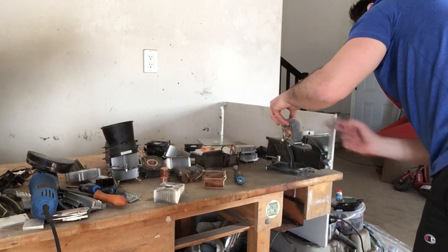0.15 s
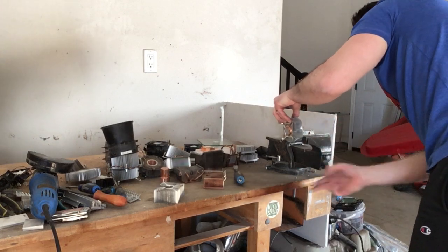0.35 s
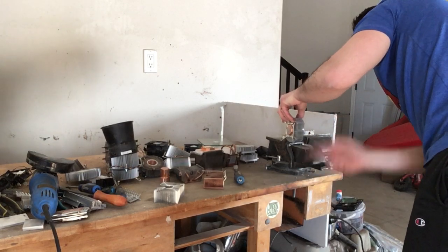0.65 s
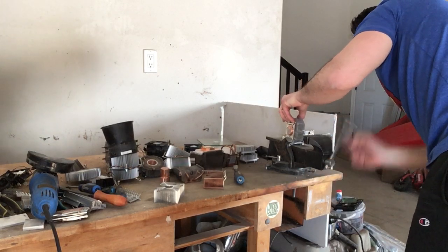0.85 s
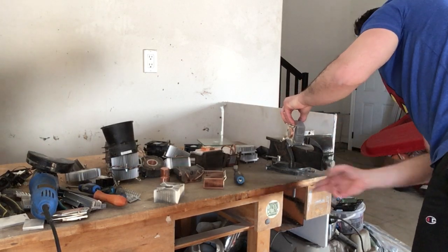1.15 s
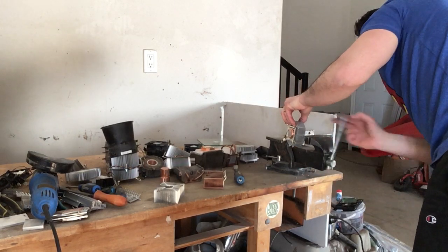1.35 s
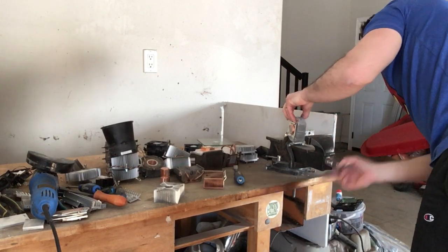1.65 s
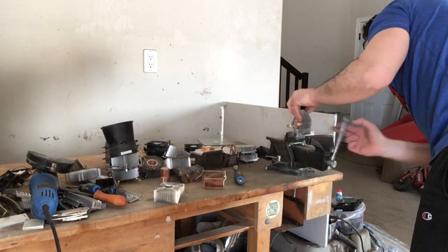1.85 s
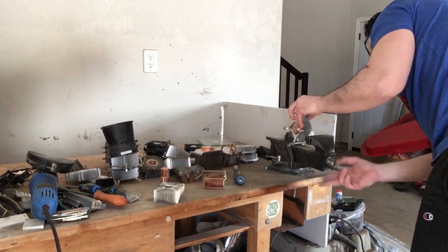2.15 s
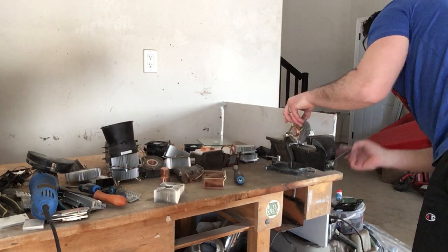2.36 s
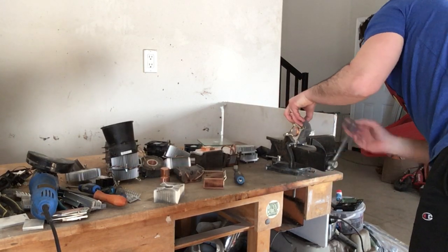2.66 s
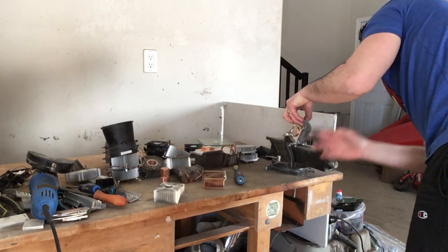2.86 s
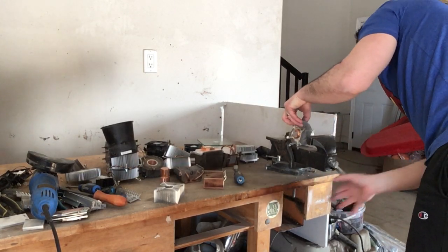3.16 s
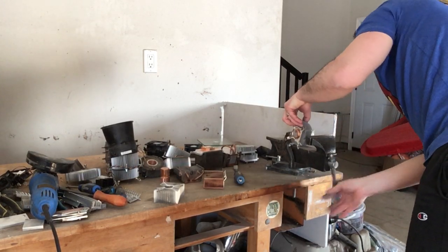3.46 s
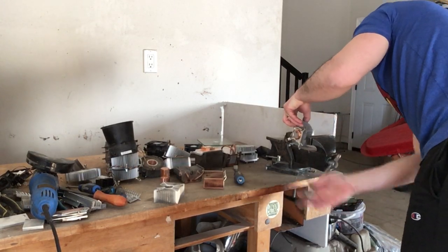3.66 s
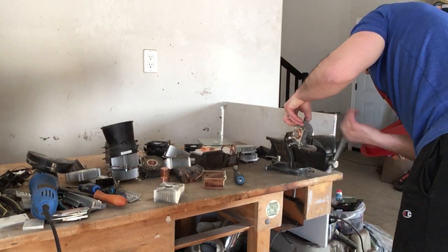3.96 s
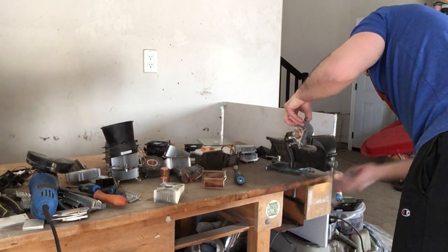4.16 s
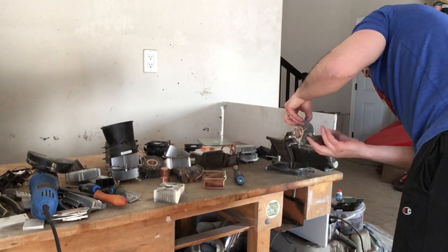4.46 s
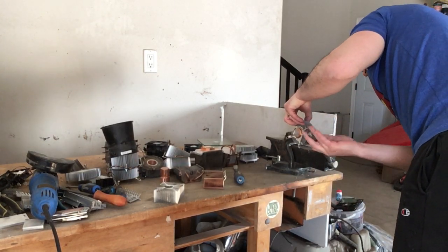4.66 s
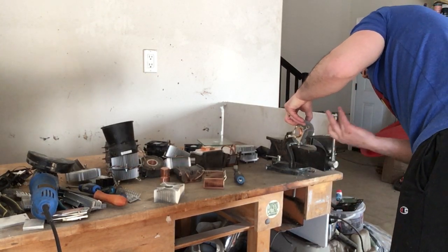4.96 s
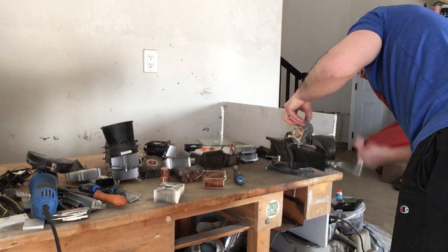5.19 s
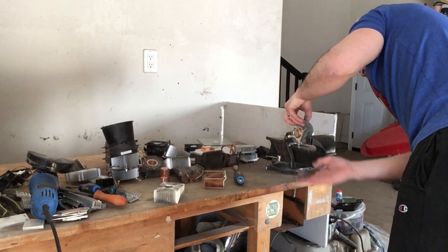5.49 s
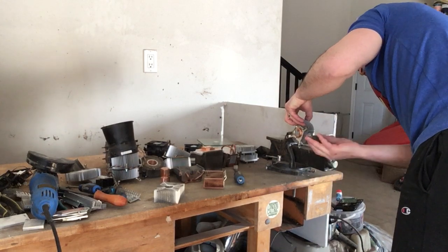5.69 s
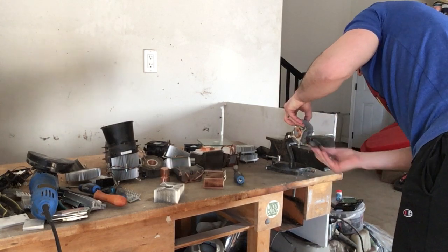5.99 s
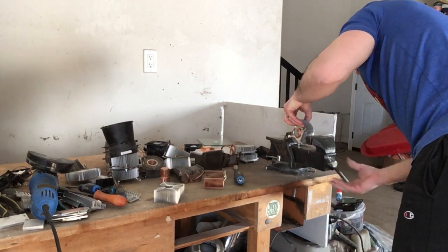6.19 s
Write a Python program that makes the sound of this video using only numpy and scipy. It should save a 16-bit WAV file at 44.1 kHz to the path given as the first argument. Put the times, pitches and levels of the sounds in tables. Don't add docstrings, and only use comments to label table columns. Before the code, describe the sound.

A heavy bench vise is worked by hand in a bare, hard-walled workshop. Soft palm slaps precede hard clanks of the sliding bar at about 0.2, 0.55, 0.93 and 1.37 seconds; the first chatters in quick repeats, and each has a sharp steel crack, a bright, short, stiff chime and a wooden bench knock. From 1.7 to 3.5 the contacts become lighter: pats, thin clicks, tinkling taps and small ringing parts, busiest around 2.7 and 3.1. Stronger clanks return at 3.77, 3.88, 4.1 and 4.23, with a duller one near 4.47. Afterward come small shuffles and rattles, a light clank at 5.2, a firm slap with a clink at 5.7, and faint taps around 6.0 to 6.2. Low, soft footsteps thud on boards from 4.5 onward. Uneven screw grinding and quiet room hum lie beneath, and walls return dense, short echoes.

```python
import sys
import numpy as np
from scipy import signal
from scipy.fft import rfft, irfft, next_fast_len
from scipy.io import wavfile
from scipy.ndimage import map_coordinates

SR = 44100
rng = np.random.default_rng(int(sys.argv[2]) if len(sys.argv) > 2 else 0)


def wav_out(sig):
    wavfile.write(sys.argv[1], SR, np.round(np.clip(np.atleast_2d(sig).T, -1, 1) * 32767).astype(np.int16))


def gain_from_db(level_db):
    decades = np.asarray(level_db, float) / 20
    return 10 ** decades


N = 279153

SPAN, TAIL = SR // 4, SR // 2
LEAD = SR // 4
T = np.arange(SPAN) / SR

# pitch_hz, width_hz, level_db
BENCH = [(112, 18, -4.5), (214.4, 27.3, 2), (328.4, 32, 1), (469, 51.5, -3), (590, 64, -11.5)]
# pitch_hz, width_hz, level_db
VISE_BODY = [(710, 113, 12), (1510, 430, 3.5), (1995, 150, 6.5), (2680, 220, -2.5)]


def unit(x):
    return x / np.sqrt(np.mean(x ** 2) + 1e-20)


def top(x):
    return x / np.abs(x).max()


def along(points, hz):
    f, v = np.transpose(points)
    return np.interp(np.log(hz + 1), np.log(f + 1), v)


def filtered(x, response):
    m = next_fast_len(len(x) + 4096)
    return irfft(rfft(x, m) * response(np.fft.rfftfreq(m, 1 / SR)), m)[:len(x)]


def shaped(x, curve):
    return filtered(x, lambda f: gain_from_db(along(curve, f)))


def resonant(peaks):
    def response(f):
        total = 0
        for k, (hz, width, db) in enumerate(peaks):
            peak = 1j * f * width / (hz * hz - f * f + 1j * f * width)
            total = total + (-1) ** k * gain_from_db(db) * peak
        return total
    return response


def ring(modes, attack=0.0001):
    waver = .005
    total = 0
    for hz, db, t60 in modes:
        strength_db = db + rng.normal(0, 1.5)
        drift = np.repeat(rng.standard_normal(SPAN // 64 + 1), 64)[:SPAN]
        clock = T + waver * np.cumsum(drift) / SR
        fade = gain_from_db(strength_db - 60 * T / t60)
        total = total + fade * np.sin(2 * np.pi * (hz * clock + rng.random()))
    return total * (1 - np.exp(-T / attack))


def puff(t60, attack=0.0001):
    return rng.standard_normal(SPAN) * gain_from_db(-60 * T / t60) * (1 - np.exp(-T / attack))


def add(track, s, hit, wet_db):
    # pitch_hz, t60_s
    wall_ring = [(200, 0.4), (600, 0.61), (1400, 0.64), (3700, 0.71), (9000, 0.57), (15000, 0.37)]
    hz, t, z = signal.stft(rng.standard_normal(TAIL), SR, nperseg=256)
    z = z * gain_from_db(-60 * t / along(wall_ring, hz)[:, None])
    tail = signal.istft(z, SR, nperseg=256)[1][:TAIL]
    tail = tail * (1 - np.exp(-(np.arange(TAIL) / SR / 0.0032) ** 2))
    echo = signal.fftconvolve(hit, tail / np.linalg.norm(tail))

    near = 0
    for k in rng.integers(SR // 600, SR // 60, size=10):
        echo_db = rng.normal(-10, 2) - 351.5 * k / SR
        near = near + gain_from_db(echo_db) * rng.choice([-1, 1]) * np.roll(hit, k)

    start = LEAD + round(s * SR)
    track[start:][:SPAN] += hit + gain_from_db(-2.0) * near
    track[start:][:len(echo)] += gain_from_db(wet_db) * echo


def clanks(track):
    # start_s, main_peak_db, low_db, third_db, fourth_db
    bar_blows = [(0.1926, -9, -17, -17.5, -11), (0.205, -18, -25, -24, -15), (0.2357, -21, -40, -35, -25),
                 (0.557, -8.5, -14, -11.5, -6.5), (0.6, -32, -41, -17, -35), (0.9318, -9, -12.5, -18, -3),
                 (0.9528, -45, -18, -14, -19), (1.373, -13.5, -11, -12.5, -10), (2.7364, -32, -5, -5, -15),
                 (3.7637, -28, -2, 1.5, -2), (3.7709, -17.5, -13, -14, -14), (3.8751, -20.5, -5, -6, -0.5),
                 (4.0943, -30, -0.5, -9.5, -17), (4.113, -22, -31, -13.5, -14),
                 (4.2277, -32, -6.5, -6.5, -0.5), (4.4696, -36.5, 11, -12, -9),
                 (5.2012, -27.5, -14, -10.5, -11.5), (5.385, -53, 13.5, 6.5, -15),
                 (5.4136, -39, -12, -14, -24), (6.0344, -64.5, 2.5, 11, 4), (6.199, -47.5, -3, -12, -29)]
    # start_s, top_db, sixth_db, crash_db
    glints = [(0.1926, -3, -4, -0.5), (0.2053, 3, -4, -1), (0.2357, -8, -1, -3), (0.557, -3, 1, 1),
              (0.6, -3, -3, -3), (0.9318, -10, -1, 3), (0.9528, -3, -3, -3), (1.373, -6, -3, 1.5),
              (2.7362, -3, -4, 3), (3.7638, -3, -5, 5), (3.7713, -1, 4, 1), (3.8751, 3, -3, 2.5),
              (4.0941, 6, -6, 3.5), (4.113, -6, -5, -3), (4.2273, 8, -6, -3), (4.4693, 10, -3, 1),
              (5.2013, -1, -4, 2), (5.385, -3, -3, 4.5), (5.4136, 10, 7, 3), (6.0344, 30, -3, 5),
              (6.199, 16, -3, 1)]
    earlier = -.18, -22, -12, -3, -14, -3, -3, 6
    # pitch_hz, level_db, t60_s
    bar_main = [(8372, 0, .04), (8450, -5, .03), (7980, -11, .03), (8690, -12, .025), (9400, -12, .015)]
    bar_low = [(1440, 0, .05), (1612, -2, .035), (715, -7, .045), (2130, -11, .03), (2600, -13, .02)]
    bar_third = [(4065, -2, .05), (4340, 0, .05), (4470, -4, .035), (4750, -7, .025), (3600, -12, .025)]
    bar_fourth = [(6000, 0, .045), (5930, -4, .04), (6270, -8, .03), (7060, -13, .03), (5690, -9, .018)]
    bar_top = [(13450, 0, .04), (13380, -4, .03), (13870, -5, .025), (13740, -7, .025), (14300, -10, .015),
               (14850, -13, .015)]
    bar_sixth = [(10970, 0, .03), (11060, -4, .02)]
    bar_seventh = [(12350, 0, .028), (12520, -4, .02)]
    # pitch_hz, level_db (per Hz)
    crack_colour = [(88, -17), (150, -9.5), (979, -12.5), (1390, -5), (3290, -10.5), (4410, -5.5),
                    (7470, -12.5), (8560, -5.5), (10200, -18.5), (13700, -15), (16000, -66)]

    blows = [(*blow, *glint[1:]) for blow, glint in zip(bar_blows, glints)]
    for s, db, low_db, third_db, fourth_db, top_db, sixth_db, crash_db in [earlier, *blows]:
        steel = ring(bar_main) + gain_from_db(low_db + 4.5) * ring(bar_low)
        steel += gain_from_db(third_db + 7.0) * ring(bar_third)
        steel += gain_from_db(fourth_db + 3.0) * ring(bar_fourth)

        shimmer = gain_from_db(top_db) * ring(bar_top)
        shimmer += gain_from_db(sixth_db - 7) * ring(bar_sixth)
        shimmer += gain_from_db(-12) * ring(bar_seventh)
        shimmer_db = -5.5 + 0.73 * (db + 17.5)

        crack = top(shaped(puff(0.027, attack=0.00066), crack_colour))
        crack = crack * (1 - np.exp(-T / 0.00021))
        snap = top(shaped(puff(0.004), crack_colour))
        crash = top(shaped(puff(.15, attack=0.0015), crack_colour))
        noise = crack + gain_from_db(-1) * snap + gain_from_db(crash_db - 6) * crash
        noise_db = 11 + 0.61 * low_db
        knock = top(filtered(puff(0.23, attack=0.012), resonant(BENCH)))

        blow = steel + gain_from_db(noise_db) * noise + gain_from_db(low_db - 4.5) * knock + gain_from_db(shimmer_db) * shimmer
        blow = gain_from_db(db - 8.5) * blow
        blow = np.roll(blow, SR // 450) + gain_from_db(-17) * blow
        add(track, s - .0009, blow, wet_db=-4.0)


def screw():
    # start_s, effort_db, lean_db
    grind = [(0, -50.5, 0.5), (.37, -46.5, 2), (.9, -45.5, 3), (1.199, -52, -5), (1.5, -47, 5.5),
             (1.69, -52, -7.5), (1.95, -59.5, 4), (2.62, -66, -4.5), (2.92, -50.5, -0.5), (3.1, -78, 5),
             (3.4, -83, -4.5), (3.551, -54.5, -6.5), (4.1, -47, 4.5), (4.75, -59.5, -2),
             (5.102, -52.5, 4.5), (5.299, -49, 2.5), (5.62, -62.5, -5), (6.33, -53.5, -1)]
    # pitch_hz, width_hz, level_db
    joists = [(75.9, 51, 0)]
    # pitch_hz, level_db (per Hz)
    rasp_colour = [(1180, -41.5), (2000, -43), (2830, 1), (4990, -0.5), (5440, -6), (6940, -11.5),
                   (15100, -18), (16000, -20.5)]

    seconds = np.arange(N) / SR
    s, effort, lean = np.transpose(grind)
    swing_db = np.interp(seconds, s, effort) + 55
    lean_db = np.interp(seconds, s, lean)

    def slip(rate):
        points = rng.standard_normal(int(N * rate / SR) + 4)
        return map_coordinates(points, [np.arange(N) * rate / SR])

    def rub():
        return unit(rng.standard_normal(N) * gain_from_db(1.5 * slip(14) + 2.5 * slip(110)))

    floor = unit(filtered(rub(), lambda f: resonant(joists)(f) ** 2))
    bench = unit(filtered(rub(), resonant(BENCH)))
    body = unit(filtered(rub(), resonant(VISE_BODY)))
    rasp = unit(shaped(rub(), rasp_colour))
    wood = gain_from_db(0.26 * swing_db - 71.0) * floor + gain_from_db(0.26 * swing_db - 57) * bench
    return gain_from_db(lean_db) * wood + gain_from_db(swing_db - 62.0) * body + gain_from_db(swing_db - 68) * rasp


def room_air():
    # pitch_hz, level_db (per Hz)
    air_colour = [(15, -44), (25, -10), (105, 17), (726, -15), (927, -6), (1430, -8), (2400, -29.5),
                  (4360, -27), (10400, -40), (13300, -24), (16500, -61)]
    return gain_from_db(-48.5 - 13.5) * unit(shaped(rng.standard_normal(N), air_colour))


def dull_touches(track):
    # start_s, level_db, pitch_hz, width_hz
    tinted_puffs = [(1.655, -47, 11400, 2490), (1.858, -39.5, 14300, 2000), (1.856, -38.5, 3630, 900),
                    (2.05, -30.5, 12500, 1220), (2.74, -38, 8300, 900), (3.092, -33, 9130, 1500),
                    (4.469, -31.5, 2580, 995), (4.468, -27.5, 4760, 1500), (4.852, -33, 1460, 1810),
                    (5.202, -32.5, 8120, 800), (5.686, -30, 2610, 1204), (5.691, -35.5, 5140, 904),
                    (6.033, -45, 2980, 810), (6.11, -44.5, 2930, 700), (6.2, -39.5, 2980, 880),
                    (0.128, -32, 1240, 905), (1.747, -44.5, 1010, 886), (1.903, -42.5, 680, 250),
              (1.95, -49.5, 704, 200), (2.05, -40.5, 1080, 700), (2.395, -38.5, 1630, 510),
              (2.686, -49, 1530, 350), (2.722, -39, 1600, 600), (2.738, -39, 1580, 300),
              (2.783, -46, 1900, 300), (2.782, -37, 3670, 900), (2.81, -46, 3670, 800),
              (2.905, -40.5, 2120, 400), (2.909, -54, 744, 246), (2.94, -44, 438, 200),
              (3.098, -44, 1680, 500), (4.104, -34, 5960, 5000), (4.109, -31, 6000, 5000),
              (3.095, -33.5, 5500, 1500), (3.128, -49, 5550, 1500), (2.744, -30, 1970, 704),
              (4.855, -52, 1780, 1200), (4.866, -50, 895, 900), (4.94, -44, 2020, 1500),
              (5.008, -43.5, 2020, 1510), (5.154, -45, 2210, 1200), (0.939, -23, 9800, 1800),
              (3.879, -27, 5300, 2000), (5.204, -37.5, 6070, 600), (4.838, -49, 910, 700),
              (4.843, -38, 800, 800), (5.108, -49, 1000, 810), (5.14, -46, 1490, 900),
              (5.981, -51.5, 2100, 352), (6.05, -43, 900, 500), (6.085, -48, 2900, 694),
              (6.21, -38.5, 895, 500), (6.216, -48, 4350, 300),
                    (0.021, -44, 7000, 8000), (0.187, -46, 7000, 8000), (0.558, -18, 9500, 5000),
               (0.933, -26, 2580, 600), (0.934, -23, 4650, 900), (0.938, -25, 5960, 900),
               (3.775, -30, 4000, 4000), (4.219, -42, 3500, 4000), (4.224, -34, 4500, 4000),
               (4.232, -39, 6000, 4000), (4.856, -37, 1310, 500), (4.905, -45, 750, 300),
               (5.07, -45, 2930, 1200), (5.11, -43, 547, 300), (5.165, -46, 3500, 1500),
               (5.684, -29, 2920, 2500), (5.687, -45, 13500, 600), (4.1, -41, 550, 300),
               (4.23, -37, 550, 300), (4.469, -31.5, 2780, 1500), (3.766, -28.5, 2900, 1200),
               (0.195, -25.5, 3080, 1200), (4.875, -47, 2800, 2000), (4.94, -44.5, 2600, 600),
               (5.012, -45, 3500, 2000), (5.688, -37, 5320, 500)]
    for s, db, hz, width in tinted_puffs:
        tint = resonant([(hz, max(width, 150), 0)])
        touch = top(filtered(puff(0.022, attack=0.00055), lambda f: tint(f) ** 2))
        add(track, s, gain_from_db(db) * touch, wet_db=-2.5)


def slaps(track):
    # start_s, peak_db, bench_db, upper_db
    palm_slaps = [(0.1285, -31.5, -9, -14), (0.4923, -21.5, -17.5, -31), (0.875, -22.5, -11.5, -29.5),
                  (1.3012, -22, -18, -36), (1.7464, -36.5, -11.5, -32), (1.8951, -48.5, 6, -12),
                  (2.1094, -56.5, 13.5, -23), (2.2644, -36.5, -4.5, -34), (2.3949, -43.5, 0, -19),
                  (3.244, -54, 1.5, -14), (3.4603, -25, -16, -20.5), (3.6949, -32, -23, -44),
                  (4.0844, -46, -3, -9), (4.8369, -37, -9, -45), (5.6839, -26.5, -10, -23.5)]
    for s, db, bench_db, upper_db in palm_slaps:
        bar = ring([(1385, 0, .06), (1450, -8, .07)], attack=.007)
        bench = ring([(709.4, -5.0, 0.066), (705, 6.5, 0.011)], attack=0.0041)
        upper = ring([(2026, 13.0, 0.03), (2180, -21.0, 0.06)], attack=0.00072)
        skin = resonant([(1500, 2000, 0)])
        pat = top(filtered(puff(0.063, attack=0.0034), lambda f: skin(f) ** 3))
        hit = bar + gain_from_db(bench_db + 12.0) * bench + gain_from_db(upper_db + 2.5) * upper + gain_from_db(-13.5) * pat
        add(track, s - .002, gain_from_db(db - 4.0) * hit, wet_db=-10)


def pings(track):
    # start_s, level_db,
    # pitch_hz, t60_s
    free_parts = [(0.195, -21, 13430, .04), (0.207, -23, 13450, 0.033), (0.559, -23, 13480, 0.03),
                  (1.375, -18.5, 13450, 0.034), (4.114, -34.5, 13450, 0.097), (0.934, -22, 13860, .025),
                  (0.936, -21, 6000, 0.046), (0.935, -23.5, 1606, 0.039), (0.936, -29, 14000, .05),
                  (1.375, -33, 10940, 0.034), (1.278, -46, 3820, 0.04), (2.118, -46, 3930, 0.03),
                  (2.239, -46, 3955, 0.1), (2.237, -41, 13100, 0.046), (2.237, -55, 10080, 0.045),
                  (2.237, -48, 7400, 0.062), (2.238, -54, 1870, 0.13), (2.611, -52, 4430, 0.033),
                  (3.093, -41, 5500, .03), (3.258, -53, 4204, 0.06), (3.461, -30, 1476, 0.035),
                  (3.772, -35, 10940, 0.08), (3.767, -32, 4050, 0.05), (4.472, -47, 1475, 0.045),
                  (3.258, -52, 1450, .12), (1.897, -50, 1445, .14), (5.204, -47, 12400, .06),
                  (4.228, -43, 10960, .04), (4.116, -42, 6000, .06), (5.684, -34, 1468, 0.11),
                  (5.687, -38, 5300, .05), (6.033, -60.5, 8440, 0.16), (6.171, -48, 4350, 0.07),
                  (6.2, -55, 4460, 0.063), (6.199, -52.5, 8400, 0.13), (2.705, -45.5, 728, 0.11),
                  (2.738, -39.5, 732, 0.12), (2.755, -46.5, 458, 0.24), (2.907, -43.5, 716, .06),
                  (2.93, -46, 462, 0.093), (4.82, -47, 1410, 0.036), (4.896, -52, 1700, 0.04),
                  (3.705, -45, 330, .15), (1.022, -39, 7060, 0.048), (4.234, -39, 8400, .08),
                  (6.2, -56, 13450, 0.13), (6.035, -58, 13450, .12), (5.416, -54, 13500, 0.089),
                  (4.8, -59, 11050, 0.063), (4.096, -38, 13450, .05)]
    for s, db, hz, t60 in free_parts:
        pair = [(hz, 0, t60), (hz * 1.012, -7, t60 / 2)]
        add(track, s, gain_from_db(db) * ring(pair, attack=0.00047), wet_db=-1.0)


def clinks(track):
    # start_s, peak_db, brightness_db, ring_hz
    light_taps = [(0.8368, -41, -16, 4140), (1.2759, -53, 18, 3900), (1.8584, -38, 16, 3850),
                  (2.035, -44.5, -19, 5400), (2.049, -27, 15, 8550), (2.1222, -44, 4, 3820),
                  (2.1696, -38, 13, 5970), (2.237, -30.5, 7, 10000), (2.422, -34.5, 9, 4570),
                  (2.4395, -37, -2.5, 4000), (2.579, -48, 8, 3850), (2.6591, -36, 2, 6120),
                  (2.6914, -40, -9, 5490), (2.722, -36, -10, 2500), (2.7365, -28, 4, 3660),
                  (2.9017, -37.5, -12.5, 3470), (2.9126, -66, -8, 3680), (3.053, -33, 10, 4420),
                  (3.091, -31, 5, 5500), (3.2567, -34, -1, 9100), (3.278, -35.5, 14, 6860),
                  (3.4397, -42, -8, 4300), (3.4631, -29, -13, 1740), (5.684, -30.5, -11.5, 5270)]
    # start_s, peak_db, brightness_db
    shuffles = [(4.769, -54, -14), (4.82, -45, -9), (4.8517, -39.5, -11), (4.895, -57, -19),
                (4.937, -39.5, -6), (5.0054, -42, 5), (5.069, -47, -6), (5.107, -59, -31),
                (5.14, -53, -33.5), (5.155, -53, -15), (5.1714, -45, -6), (5.3833, -41.5, -23.5),
                (5.9711, -46, -16.5), (6.0308, -51, -21), (6.07, -54.5, -29), (6.111, -55.5, -30.5),
                (6.199, -46, -23.5)]
    free = 0.027, -0.2
    held = .04, -5

    contacts = [(*row, -6, *free) for row in light_taps]
    contacts += [(*row, 3800, -24, *held) for row in shuffles]
    click_colour = resonant([(4500, 6500, 0)])
    sparkle_colour = resonant([(11000, 8000, 0)])
    for s, db, bright_db, hz, ring_db, t60, wet_db in contacts:
        click = top(filtered(puff(t60, attack=0.00018), lambda f: click_colour(f) ** 2))
        sparkle = top(filtered(puff(.02, attack=.0008), lambda f: sparkle_colour(f) ** 2))
        part = ring([(hz, 0, .016), (hz * 1.03, -2, .012), (hz * .965, -3, .012)])
        body = top(filtered(puff(0.091), resonant(VISE_BODY)))
        bench = top(filtered(puff(0.14, attack=.003), resonant(BENCH)))
        body_db = -14 - 0.88 * bright_db
        hit = click + gain_from_db(ring_db) * part + gain_from_db(bright_db - 13.0) * sparkle
        hit = hit + gain_from_db(body_db) * (body + 0.88 * bench)
        add(track, s - .0004, gain_from_db(db - 3.0) * hit, wet_db)


def steps(track):
    # start_s, peak_db, boards_db, rattle_db, boom_hz
    footsteps = [(4.49, -47, -14, -20, 110), (4.831, -52.5, 0.5, 15.5, 116), (4.913, -45.5, 2, 1.5, 124),
                 (5.041, -47.5, -38, -23, 77.5), (5.269, -47, -5, -17, 85), (5.512, -47, -2, -11, 86.4),
                 (5.754, -44, -8.5, -11, 81), (6.002, -45.5, -3, -23.5, 87.3), (6.26, -45, -8, -17, 91)]
    # pitch_hz, width_hz, level_db
    floor_boards = [(204, 228, 0.5), (315, 190, 1)], [(460, 100, 31), (646, 340, 27)]
    press = np.sin(np.pi * np.clip(T / .095, 0, 1) ** .45)
    bend = T + .005 * (1 - np.exp(-T / .02))
    for s, db, boards_db, rattle_db, hz in footsteps:
        boom = press * np.sin(2 * np.pi * .86 * hz * bend)
        boards = top(filtered(puff(0.3, attack=0.0031), resonant(floor_boards[0])))
        rattle = top(filtered(puff(0.29, attack=0.0026), resonant(floor_boards[1])))
        thud = boom + gain_from_db(boards_db + 11.0) * boards + gain_from_db(rattle_db) * rattle
        add(track, s - .006, gain_from_db(db) * thud, wet_db=-4.5)


def scene():
    track = np.zeros(LEAD + N + SPAN + TAIL)
    for source in clanks, dull_touches, slaps, pings, clinks, steps:
        source(track)
    return (track[LEAD:][:N] + screw() + room_air())[None]


def without_hidden_treble(sound):
    hz, _, z = signal.stft(sound, SR, nperseg=1024)
    last = hz > 14650
    under = (hz > 12000) & (hz < 14200)
    last_level = np.abs(z[last & (hz < 15500)]).mean(0)
    hidden = last_level < gain_from_db(-25) * np.abs(z[under]).max(0)
    loud = np.abs(z[under]).mean(0)
    hidden &= loud < 1.3 * np.roll(loud, 2)
    z[np.ix_(last, hidden)] = 0
    return signal.istft(z, SR, nperseg=1024)[1][:N]


def top_cut(x):
    return signal.sosfilt(signal.butter(12, 16400, fs=SR, output="sos"), x)


def record(dry):
    thin = signal.sosfilt(signal.butter(5, 58, "high", fs=SR, output="sos"), dry[0])
    thin = without_hidden_treble(thin)
    thin = filtered(thin, lambda f: 1 / (1 + (f / 15850) ** 120))
    return top_cut(thin[None])


dry = scene()
out = record(dry)
wav_out(out)
```